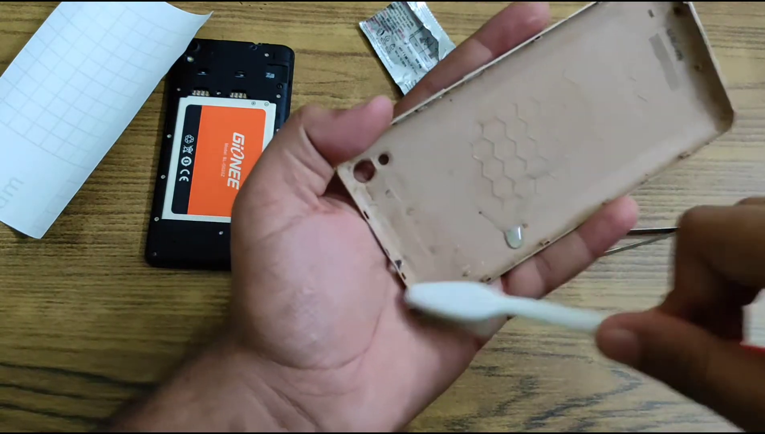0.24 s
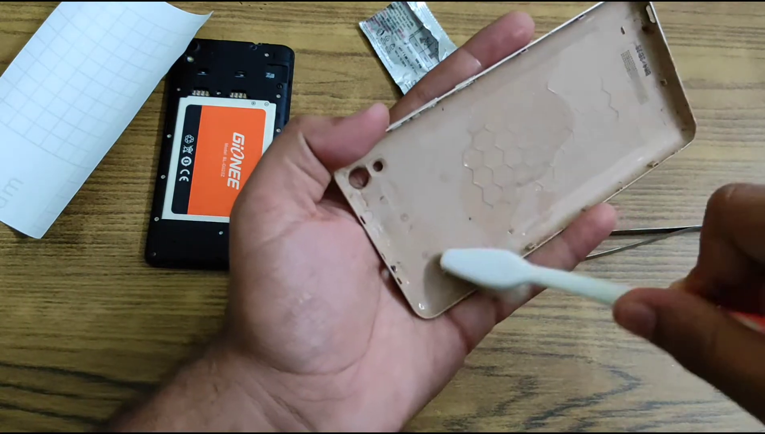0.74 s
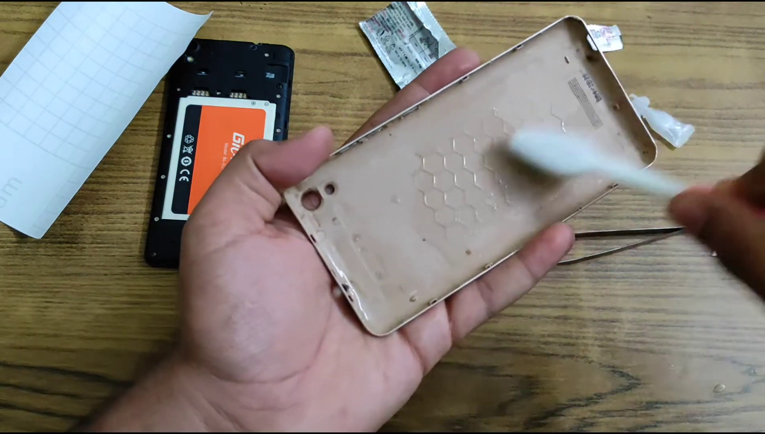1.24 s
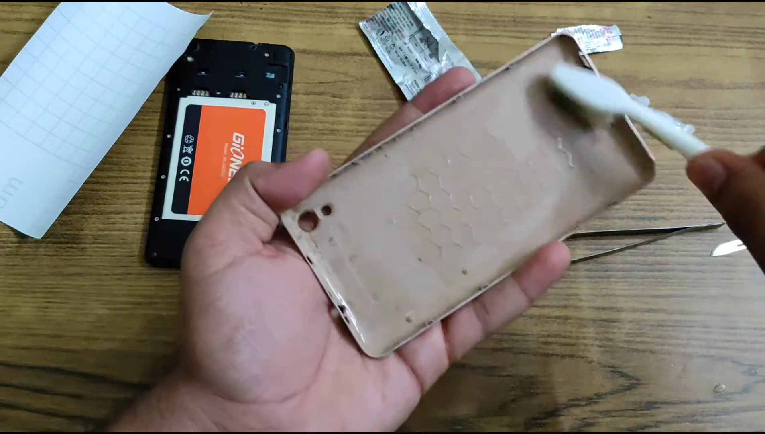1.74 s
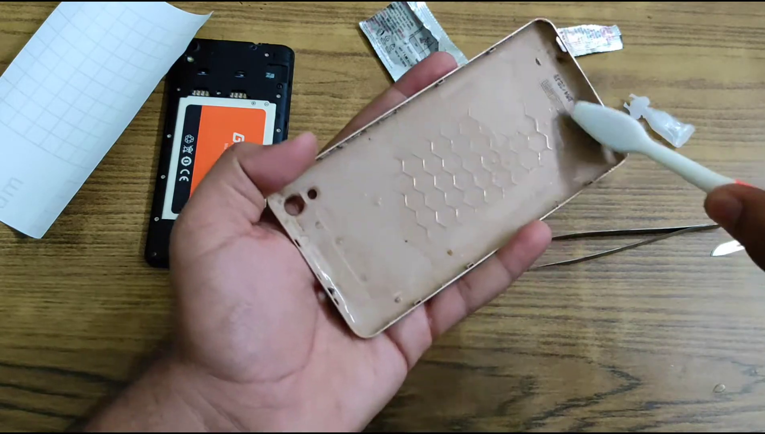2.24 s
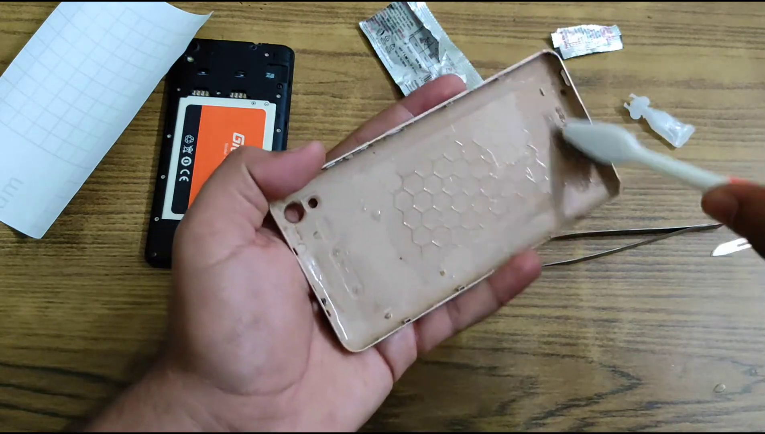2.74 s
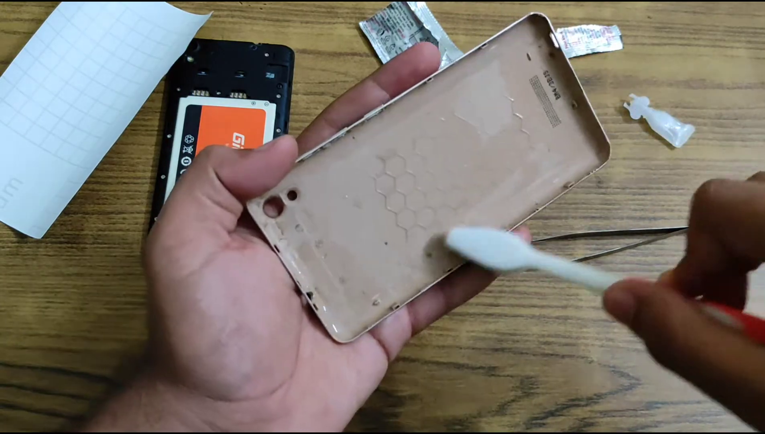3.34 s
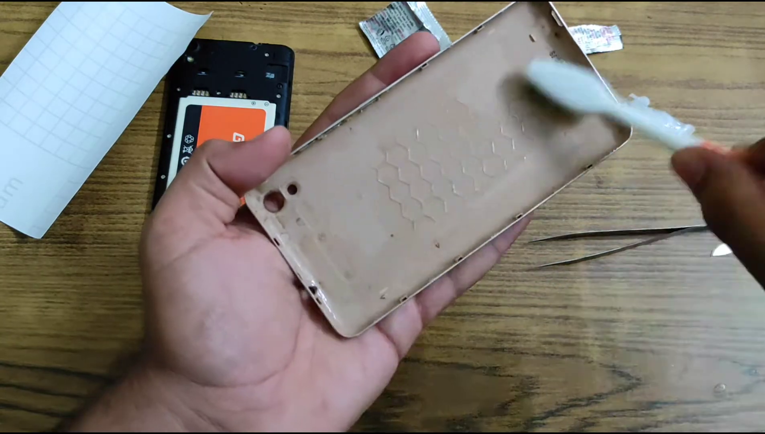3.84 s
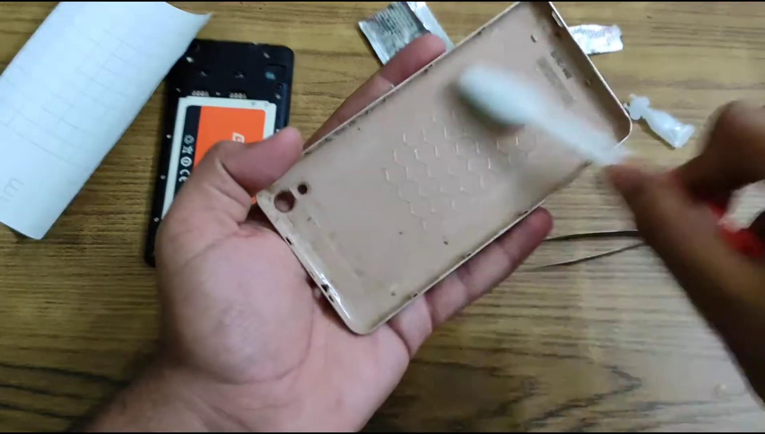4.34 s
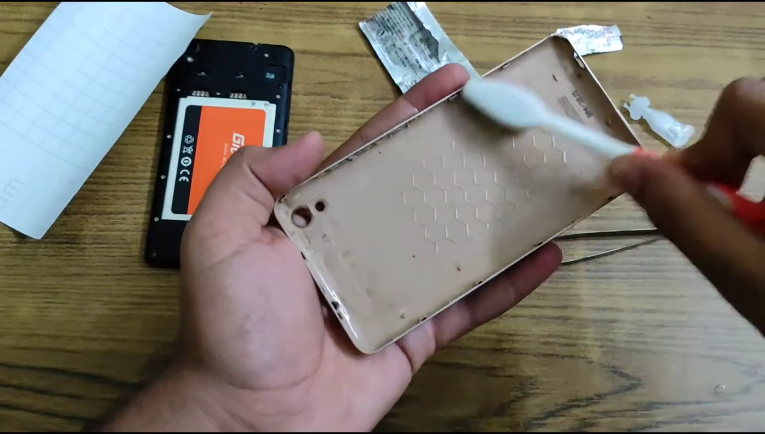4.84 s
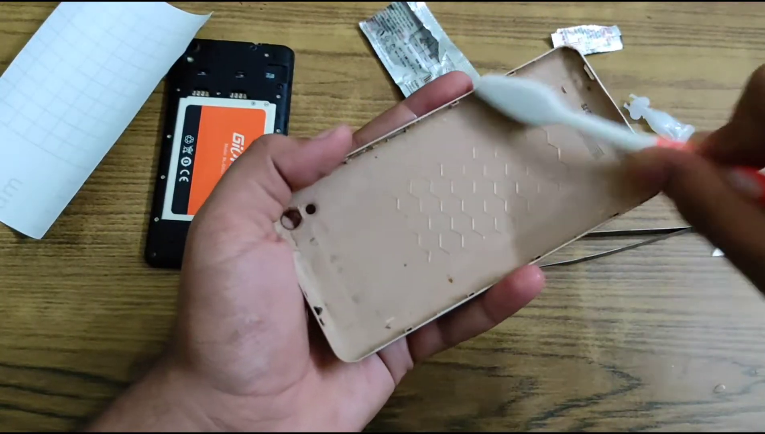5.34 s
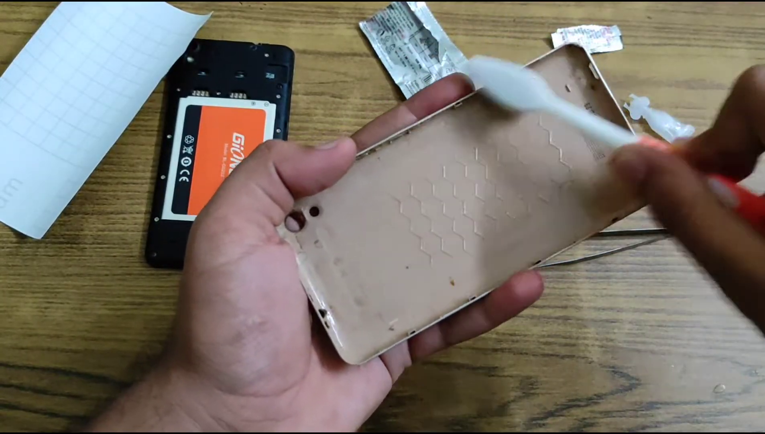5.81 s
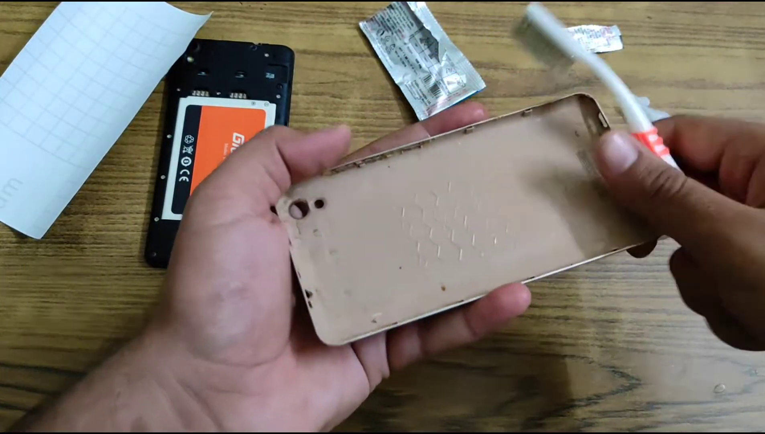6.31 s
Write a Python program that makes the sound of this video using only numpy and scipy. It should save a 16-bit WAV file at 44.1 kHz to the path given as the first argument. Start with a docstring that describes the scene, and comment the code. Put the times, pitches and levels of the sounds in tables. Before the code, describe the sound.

Fast bristly scrubbing on a hollow plastic cover, grainy and bright, growing louder and harder midway, then stopping with a light tap.

```python
"""A wet toothbrush scrubs the inside of a phone's plastic back cover, held in one hand in a small room.
Each stroke follows a sine arch of speed; bristles snap free in random swarms and drum on the shell's modes.
Bristles let go in short bursts, the head knocks and rasps as struck or slipping modes and once judders on the edge.
Fingers, one dull bump, thin drones, hum and room air lie beneath; two microphone ports ring in the treble."""
import sys
import numpy as np
from scipy import signal
from scipy.fft import rfft, irfft
from scipy.io import wavfile
from scipy.ndimage import uniform_filter1d

SR = 44100
rng = np.random.default_rng(int(sys.argv[2]) if len(sys.argv) > 2 else 0)


def materialize(psi):
    """Save the field psi as 16-bit PCM at rate SR to the path in sys.argv[1].

    A 1-D psi becomes a single channel; in a 2-D psi each row is a channel.
    """
    bounded = np.clip(np.atleast_2d(psi).T, -1, 1)
    quanta = np.round(bounded * 32767).astype(np.int16)
    wavfile.write(sys.argv[1], SR, quanta)


N = 289737
TIME = np.arange(N) / SR
BINS = np.fft.rfftfreq(4096, 1 / SR)
HZ = np.fft.rfftfreq(N, 1 / SR)

# Where the brush works. Each row: time in seconds, place from 0 (stiff end wall) to 1 (soft middle of
# the panel), share of bristles scraping the rim (0-1).
PLACE = [(0, 0.85, 0.62), (.42, .2, 1), (.6, 0.16, 0.4), (.85, 0.86, 1), (1.1, 1, 0.6), (1.4, 0.4, 0.27),
         (1.55, 0.036, 0.8), (2.15, 0.17, 1), (2.5, 0.035, 0.96), (2.95, 0.29, 0.6), (3.3, 0.86, 0.62),
         (3.6, 0.87, 0.1), (4.3, 0.58, .15), (4.651, 0.54, 0.04), (4.9, 0.47, 0.27), (5.06, 0.95, 0.52),
         (5.4, 0.85, 0.55), (6, 0.59, 0.75)]
# Spectrum of one bristle snapping on the hard rim. Each row: frequency in Hz, relative level in dB per Hz.
RIM_SPECTRUM = [(150, -63), (600, -16.5), (1400, -8), (2100, 3.5), (3000, 4), (4300, -1), (5300, 5),
                (6500, 0), (8000, -1.5), (9300, -0.5), (10400, -12.5), (12500, -9.5), (16000, -8)]


def amp(db):
    """Decibels to gain."""
    return 10 ** (np.asarray(db) / 20)


def unit(x):
    """Scales to an rms of 1."""
    return x / np.sqrt(np.mean(x ** 2) + 1e-20)


def read(points, hz):
    """Reads a table on a log-frequency axis."""
    f, value = np.transpose(points)
    return np.interp(np.log(hz + 1), np.log(f + 1), value)


def level(s, db):
    """Gain midway between linear and dB interpolation of a level curve, silent outside it."""
    linear = np.interp(TIME, s, amp(db), left=0, right=0)
    logarithmic = amp(np.interp(TIME, s, db))
    return np.sqrt(linear) * np.sqrt(logarithmic)


def add(mix, s, sound):
    """Adds a sound in place at s seconds, cut at the end of the mix."""
    part = mix[round(s * SR):][:len(sound)]
    part += sound[:len(part)]


def causal(gain):
    """Minimum-phase click with this magnitude spectrum."""
    log_gain = np.log(np.maximum(gain, 1e-5))
    mirrored = np.r_[log_gain, log_gain[-2:0:-1]]
    return np.fft.ifft(np.exp(np.conj(signal.hilbert(mirrored)))).real


def ring(x, click):
    """Convolves with a click scaled to unit energy."""
    return signal.oaconvolve(x, click / np.linalg.norm(click))[:N]


def peak(hz, width):
    """Magnitude of one resonance."""
    return BINS * width / np.hypot(hz ** 2 - BINS ** 2, BINS * width)


def wavering(hz, half_width_hz):
    """Narrow noise around one pitch, so a tone that wavers."""
    return unit(irfft(rfft(rng.standard_normal(N)) / (1 + ((HZ - hz) / half_width_hz) ** 2), N))


def rim_snap():
    """Click of one bristle snapping on the hard rim."""
    return causal(amp(read(RIM_SPECTRUM, BINS)))


def shell(where, blow_hz=1000, slope_db=0.0):
    """Ring of the shell driven at one place; a blow favours modes near its own pitch, by slope_db an octave."""
    # Modes of the plastic shell. Each row: frequency in Hz, width in Hz, then relative level in dB when
    # driven on the panel, at the long edge, at the end wall.
    modes = [(278, 127, -6, 1, 1), (355, 68, 0.5, 8, -6), (431, 82, -1.5, 5.5, -25),
             (500, 114, 1.5, -1, -3.5), (697, 360, -5, -1.5, -5), (800, 210, -5, -12, -6),
             (896, 180, -2.5, 3.5, -14), (1004, 175, -1, 4, 11), (1162, 290, -2.5, -4.5, 6),
             (1843, 310, 0.5, -1.5, -7.5), (1920, 200, -1.5, 2, -23), (2088, 520, 1.5, 0.5, 2),
             (2550, 370, -2, -6, -2), (2820, 150, 1, -6, 0.5), (3725, 630, -3.5, -8.5, -4)]
    power = np.zeros(len(BINS))
    for hz, width, panel, edge, wall in modes:
        place_db = {"panel": panel, "edge": edge, "wall": wall}[where]
        db = place_db - slope_db * abs(np.log2(hz / blow_hz))
        power += (amp(db) * peak(hz, width) ** 2) ** 2  # steep skirts leave dark valleys between the modes
    return causal(np.sqrt(power))


def snaps(per_s, spread_db):
    """Random releases of either sign, most small and a few large."""
    at = np.flatnonzero(rng.random(N) < per_s / SR)
    size = np.minimum(rng.exponential(1, len(at)), 4)
    sign = rng.choice([-1., 1.], len(at))
    train = np.zeros(N)
    train[at] = sign * amp(spread_db * size)
    return unit(train)


def clumps(hz, depth_db):
    """Tufts catch and let go together, so the swarm comes in lumps."""
    slow = irfft(rfft(rng.standard_normal(N)) / (1 + (HZ / hz) ** 2), N)
    return unit(amp(depth_db * unit(slow)))


def pair(x, lag):
    """Sound that reaches the right port lag seconds after the left."""
    return np.array([x, np.interp(TIME - round(lag * SR) / SR, TIME, x)])


def strokes(swish_gain_db=0.12, drum_gain_db=0.5, drum_power=0.5):
    """Brush speed rises and falls along a sine arch; swish follows it, drumming its power drum_power."""
    # Each row: start in seconds, time speeding up in seconds, time slowing down in seconds, crest exponent
    # (about 1 = broad, 5 = peaked), relative bristle swish in dB, relative drumming of the shell in dB.
    stroke_rows = [(-0.055, 0.021, 0.14, 2.9, -32.5, -47), (0.158, 0.12, 0.055, 0.98, -37, -51),
                   (0.406, 0.012, 0.063, 2.6, -34.5, -49.5), (0.442, 0.083, 0.12, 2.5, -34.5, -53.0),
                   (0.666, 0.0095, 0.061, 2.9, -36.5, -48), (0.722, 0.085, 0.092, 2.7, -30.5, -39),
                   (0.874, 0.069, 0.021, 1.6, -45.0, -61), (0.966, 0.13, 0.11, 2.7, -37, -49),
                   (1.17, 0.1, 0.031, 1.37, -33, -47.0), (1.305, 0.091, 0.041, 1.16, -34, -49),
                   (1.473, 0.11, 0.062, 2, -38, -43.5), (1.641, 0.089, 0.06, 1.27, -32, -46),
                   (1.759, 0.093, 0.123, 1.9, -37.0, -44.5), (1.933, 0.08, 0.087, 2.3, -35, -46.0),
                   (2.082, 0.039, 0.11, 2.04, -30.5, -41), (2.191, 0.15, 0.0046, 2, -34.5, -49),
                   (2.379, 0.099, 0.19, 2.43, -35.5, -48), (2.668, 0.087, 0.099, 1.27, -36.5, -48.5),
                   (2.85, 0.11, 0.076, 2.4, -31.5, -44), (3.05, 0.29, 0.073, 4.5, -35.5, -51.5),
                   (3.38, 0.082, 0.097, 1.5, -37, -55), (3.541, 0.058, 0.14, 1.8, -32.5, -55.5),
                   (3.668, 0.15, 0.054, 2.3, -30, -43), (3.852, 0.046, 0.12, 1.63, -29, -42.5),
                   (3.998, 0.083, 0.046, 1.6, -26.5, -38), (4.137, 0.043, 0.078, 0.81, -28, -44),
                   (4.239, 0.093, 0.035, 1.3, -25.5, -40.5), (4.377, 0.033, 0.087, 1.7, -24.5, -43.0),
                   (4.468, 0.091, 0.045, 2.2, -26.5, -42), (4.605, 0.031, 0.1, 2.55, -26, -42.0),
                   (4.73, 0.073, 0.054, 1.17, -28.5, -41.0), (4.858, 0.052, 0.071, 2.2, -28.5, -42.5),
                   (4.971, 0.12, 0.071, 2.16, -24, -35.5), (5.172, 0.03, 0.054, 0.64, -34, -50.5),
                   (5.272, 0.078, 0.03, 1.36, -25.5, -42.0), (5.41, 0.035, 0.075, 0.81, -41.0, -61.0),
                   (5.522, 0.025, 0.089, 1.36, -30.5, -49), (5.641, 0.026, 0.033, 1.8, -44, -57.5),
                   (5.757, 0.053, 0.12, 4.3, -34.5, -50), (5.95, 0.08, 0.068, 3.3, -33.5, -47)]
    swish, drum = np.zeros((2, N))
    for start, rise, fall, crest, swish_db, drum_db in stroke_rows:
        ramp = np.minimum((TIME - start) / rise, 1 - (TIME - start - rise) / fall)
        moving = ramp > 0
        speed = np.sin(np.pi / 2 * ramp[moving]) ** crest
        swish[moving] += (amp(swish_db) * speed) ** 2
        drum[moving] += (amp(drum_db) * speed ** drum_power) ** 2
    return amp(swish_gain_db) * np.sqrt(swish), amp(drum_gain_db) * np.sqrt(drum)


def flicks(rise_s=0.0021, decay_s=0.009):
    """Effort of short bursts of bristles letting go, on rim or panel: each swells at once, dies exponentially."""
    # Each row: start in seconds, relative level in dB.
    flick_rows = [(0.169, -32.5), (0.412, -34), (0.499, -27.5), (0.764, -32), (1.009, -39), (1.347, -31),
                  (2.701, -37), (3.413, -33.5), (4.247, -36), (4.412, -21.5), (4.886, -37), (5.026, -22.5),
                  (5.047, -15.5), (5.058, -20), (5.288, -28), (6, -29)]
    spray, t = np.zeros(N), TIME[:SR // 12]
    burst = np.minimum(t / rise_s, np.exp((rise_s - t) / decay_s))
    for s, db in flick_rows:
        add(spray, s, amp(db) * burst)
    return spray


def bristles(effort, count=6):
    """Tufts lie at different places under the ports; each scrapes on the rim or slides on the wet panel."""
    # Slide of one bristle on the wet panel. Each row: frequency in Hz, relative level in dB per Hz.
    slide_spectrum = [(150, -36), (600, -16.5), (1400, -20), (2100, -15), (4300, -4.5), (5500, -5),
                      (7000, -2.5), (8500, 0.5), (9400, -2), (10400, -8.5), (12500, -7.5), (16000, -6)]
    s, _, share = np.transpose(PLACE)
    rim = np.interp(TIME, s, share)
    snap, slide = rim_snap(), causal(amp(read(slide_spectrum, BINS)))
    out = np.zeros((2, N))
    for lag in np.linspace(-.00016, .00016, count):
        scraping = ring(effort * np.sqrt(rim) * snaps(per_s=600, spread_db=0.0), snap)
        sliding = ring(effort * np.sqrt(1 - rim) * snaps(per_s=1100, spread_db=1.0), slide)
        out += pair(amp(-14.0) * scraping + amp(-15.5) * sliding, lag)
    return out / np.sqrt(count)


def crackle(effort, count=12, cycles=3.1, crackle_db=-35.0):
    """Single wet bristles catch and ping at one of count pitches, decaying by 1/e in a few cycles."""
    train = effort * snaps(per_s=210, spread_db=4.5)
    which = rng.integers(0, count, N)
    t, out = TIME[:SR // 100], np.zeros(N)
    for k, hz in enumerate(np.geomspace(2300, 7000, count)):
        ping = np.exp(-t * hz / cycles) * np.sin(2 * np.pi * hz * t)
        out += ring(train * (which == k), ping)
    return amp(crackle_db) * out


def catches(effort, per_s=70, catch_db=1.5):
    """Single bristles hook a rib of the shell at random and snap out above the swarm."""
    hooked = (rng.random(N) < per_s / SR) * rng.uniform(.4, 1, N)
    return amp(catch_db) * ring(effort * hooked, rim_snap())


def hard_snaps(snap_db=-0.5):
    """Single stiff bristles strike the rim and stand out above the swarm."""
    # Each row: time in seconds, relative level in dB.
    snap_rows = [(0.413, -36), (0.676, -43), (0.766, -31), (1.008, -45), (2.0355, -21.5), (2.3302, -27),
                 (4.2488, -20), (4.4165, -25), (5.0502, -14), (5.29, -25), (5.347, -22)]
    train = np.zeros(N)
    for s, db in snap_rows:
        add(train, s, amp([db]))
    return amp(snap_db) * ring(train, rim_snap())


def drumming(press):
    """Snaps shake the shell: bright near the end wall, deeper in the middle."""
    s, place, _ = np.transpose(PLACE)
    soft = np.interp(TIME, s, place)
    stiff = ring(press * np.sqrt(1 - soft) * snaps(per_s=1800, spread_db=0.5), shell("wall"))
    deep = ring(press * np.sqrt(soft) * snaps(per_s=1400, spread_db=3.5), shell("panel"))
    return amp(-3.0) * stiff + amp(-4.5) * deep


def knocks(rebound_s=0.0027, rebound=0.67):
    """The brush head strikes the shell: a hard tick, the ring of the modes and one quick rebound."""
    # Each row: start in seconds, relative level in dB, relative treble tick in dB, favoured pitch in Hz.
    knock_rows = [(1.064, -35, 4, 750), (1.341, -38, -20, 330), (1.762, -32, -20, 800),
                  (2.034, -25.5, -2, 1000), (2.045, -29.5, -19, 900), (2.328, -29, -27, 1200),
                  (2.511, -30, -17, 1120), (2.8, -31, -17, 800), (2.965, -33.5, 2, 650),
                  (4.058, -39, -8.5, 500), (4.249, -27, 0.5, 550), (4.507, -29, -1, 800),
                  (4.632, -32.5, -7, 320), (4.811, -26.5, -11, 1500), (4.912, -24, 4, 550),
                  (5.095, -27, -10.5, 900), (5.189, -32, -15, 1800), (5.304, -33, -15, 500),
                  (6.266, -25.5, 0, 720)]
    out, tick = np.zeros(N), unit(rim_snap())
    for s, db, tick_db, blow_hz in knock_rows:
        body = unit(shell("panel", blow_hz, slope_db=4.5))
        blow = amp(db) * (amp(-22.5) * body + amp(tick_db - 34.5) * tick)
        add(out, s, blow)
        add(out, s + rebound_s * rng.uniform(0.582, 1.4), rebound * blow)
    return out


def rasps(slope_db=4.0, attack_s=0.0015, fade_s=0.0042):
    """The hard edge of the head slips in a short close run and rings the modes near one pitch."""
    # Each row: start in seconds, length before the fade in seconds, relative level in dB, favoured pitch in Hz.
    rasp_rows = [(.175, 0.011, -47, 400), (0.497, 0.029, -44, 800), (1.441, .05, -51.5, 1400),
                 (1.511, 0.066, -47, 1000), (2.483, 0.026, -36.5, 1300), (2.698, 0.017, -42.5, 1560),
                 (2.936, 0.033, -45, 800), (4.253, 0.039, -38, 453), (4.438, .03, -44.5, 700),
                 (4.814, 0.02, -43.5, 1490), (4.995, 0.007, -44, 1990), (6.268, 0.011, -43.5, 254)]
    out, t = np.zeros(N), TIME[:SR // 8]
    for s, length, db, hz in rasp_rows:
        slips = unit(rng.standard_normal(len(t)) * (rng.random(len(t)) < 1500 / SR))
        force = np.minimum(t / attack_s, 1) * np.exp(-np.maximum(t - length, 0) / fade_s)
        add(out, s, amp(db) * ring(force * slips, shell("panel", hz, slope_db)))
    return amp(-2.5) * out


def judder(slip_hz=190):
    """Uneven stick and slip of the head against the edge shakes the shell and scrapes the rim."""
    # Each row: time in seconds, relative level in dB.
    judder_curve = [(0.791, -55), (.794, -30.5), (.812, -27.5), (0.831, -32.5), (0.859, -34), (0.871, -61)]
    turns = np.cumsum(slip_hz * clumps(hz=299.7, depth_db=3.5)) / SR  # slip_hz is the rms rate
    slips = np.diff(np.floor(turns), prepend=0) * rng.uniform(0.54, 1, N)
    force = level(*np.transpose(judder_curve))
    rough = unit(unit(slips) + 1.15 * rng.standard_normal(N))
    hollow = ring(force * rough, shell("edge"))
    scrape = ring(force * snaps(per_s=4300, spread_db=3.0), rim_snap())
    return amp(-0.5) * hollow + amp(-13.5) * scrape


def fingers():
    """Skin rubs softly over the plastic as the cover is turned over: dense small snaps."""
    # Each row: time in seconds, relative level in dB.
    rub_curve = [(6.268, -73), (6.28, -51), (6.325, -50.5), (6.39, -80), (6.497, -82), (6.504, -58.5),
                 (6.57, -67)]
    rub = level(*np.transpose(rub_curve)) * snaps(per_s=3000, spread_db=5.0)
    return amp(-16) * ring(rub, rim_snap())


def bump(decay_s=0.0094):
    """One dull bump: decaying noise rings two low modes, in opposite directions at the two ports."""
    # One row: start in seconds, relative level in dB.
    bump_row = (4.251, -25)
    s, db = bump_row
    push = np.zeros(N)
    add(push, s, amp(db) * np.exp(-TIME[:SR // 8] / decay_s))
    thud = ring(push * rng.standard_normal(N), causal(peak(195, 130) + 0.71 * peak(350, 180)))
    return amp(1.5) * np.array([-.6 * thud, thud])


def shifting(x):
    """Random slow and quick changes of colour at each port make the scrubbing grainy and uneven."""
    z = signal.stft(x, SR, nperseg=512)[2]
    slow, quick = rng.standard_normal((2, *z.shape))
    for axis, size in [(1, 3), (1, 3), (2, 12), (2, 12)]:  # axis 1 = frequency bins, 2 = frames
        slow = uniform_filter1d(slow, size, axis)
    quick = uniform_filter1d(uniform_filter1d(quick, size=4, axis=1), size=2, axis=2)
    gain_db = 1.4 * unit(slow) + 2.6 * unit(quick) - 1.1
    return signal.istft(z * amp(gain_db), SR, nperseg=512)[1][:, :N]


def aimed(x, top_hz=10500):
    """The brush moves and turns under the ports: the swish leans to one side, its top octave swells and fades."""
    # Each row: time in seconds, left minus right in dB, gain above top_hz in dB.
    aim_curve = [(0, -.5, -2), (.45, 0.5, 2.5), (1.2, 2, 2.5), (1.7, -1, -2), (2.2, 0, 2.5),
                 (2.75, 0.5, -2.5), (3.2, 0, -3), (3.6, 1, 1.5), (4.3, -2.1, -2), (4.75, -2, -2),
                 (5.08, -1.5, -7.5), (5.5, -1, -2), (6, -0.5, -2.5)]
    s, lean_db, top_db = np.transpose(aim_curve)
    top = irfft(rfft(x) * (1 - 1 / (1 + (HZ / top_hz) ** 16)), N)
    lean = np.interp(TIME, s, lean_db) / 2
    bright = x + (amp(np.interp(TIME, s, top_db)) - 1) * top
    return bright * amp([lean, -lean])


def room(x, table_db=-8.0, tail_db=-8.0, count=4):
    """Quick echoes from table and hands, which change as the hands move, then the tail of the walls."""
    # Decay of the tail. Each row: frequency in Hz, time to fall 60 dB in seconds.
    t60_curve = [(200, 0.53), (1000, 0.45), (4000, 0.44), (8000, 0.34), (15000, 0.38)]
    out = x.copy()
    knots = np.arange(0, N / SR + .2, .14)
    chosen = np.eye(count)[rng.integers(0, count, len(knots))].T
    early = TIME[:SR // 80]
    for weight in chosen:  # one echo pattern per pose of the hands, crossfaded
        pose = np.interp(TIME, knots, weight)
        near = rng.standard_normal((2, len(early))) * (early > .0006) * np.exp(-early / 0.006)
        near /= np.linalg.norm(near[0])
        out += amp(table_db) * signal.oaconvolve(x * np.sqrt(pose), near, axes=1)[:, :N]
    size = SR // 2
    taps = rng.choice([-1., 1.], (2, size)) * (rng.random((2, size)) < 4000 / SR) * (TIME[:size] > .006)
    hz, t, z = signal.stft(taps, SR, nperseg=256)
    decay = amp(-60 * t / read(t60_curve, hz)[:, None])
    tail = signal.istft(z * decay, SR, nperseg=256)[1][:, :size]
    return out + amp(tail_db) * signal.oaconvolve(x, tail / np.linalg.norm(tail[0]), axes=1)[:, :N]


def drones():
    """Faint thin wavering tones, like far traffic, that swell and fade along a half sine."""
    # Each row: start in seconds, end in seconds, pitch in Hz, level in dB.
    drone_rows = [(3.072, 3.63, 399, -62.5), (6.265, 6.698, 276.4, -60)]
    out = np.zeros(N)
    for start, end, pitch_hz, db in drone_rows:
        swell = np.sin(np.pi * np.clip((TIME - start) / (end - start), 0, 1))
        out += amp(db) * wavering(pitch_hz, half_width_hz=3.5) * swell
    return out


def air(air_db=-55.5, hum_db=-62.0, hum_hz=62.4):
    """Still room air, low noise nearly alike at both ports in the bass, and a wavering hum."""
    # Each row: frequency in Hz, relative level in dB per Hz.
    air_spectrum = [(10, 1.5), (25, 7.5), (42, -8), (100, -6), (200, -0.5), (350, -8), (700, -15.5),
                    (1500, -21), (3000, -29), (8000, -45), (15000, -76)]
    shared, *own = rfft(rng.standard_normal((3, N)))
    same = 0.73 / (1 + (HZ / 1800) ** 2)  # share of power common to both ports
    mixed = np.sqrt(same) * shared + np.sqrt(1 - same) * np.array(own)
    noise = irfft(mixed * amp(read(air_spectrum, HZ)), N)
    both = amp(air_db) * unit(noise) + amp(hum_db) * wavering(hum_hz, half_width_hz=6)
    return both * amp([[1.5], [-1.7]])


def scene():
    """The strokes drive bristles and shell together; both sound into the room."""
    sweep, drum = strokes()
    grip = clumps(hz=127, depth_db=0.93)
    effort, press = grip * np.hypot(sweep, flicks()), grip * drum
    swarm = shifting(bristles(effort) + pair(crackle(effort), lag=-.00003))
    single = pair(hard_snaps() + catches(effort) + fingers(), lag=.00002)
    swish = aimed(swarm + single)
    head = pair(judder() + rasps() + knocks(), lag=.00004) * amp([[.8], [-.8]])
    plastic = shifting(pair(drumming(press), lag=.00005)) + head
    wet = room(swish, table_db=1.0, tail_db=-6.5) + room(plastic, table_db=-7.5, tail_db=-8.5)
    return wet + bump() + drones() + air()


def record(dry, edge_hz=15850):
    """Each microphone port rings at its own pitch; then the band limit."""
    # Left, then right. Each row: resonance in Hz, width in Hz, resonance gain in dB.
    port_rows = [(8580, 896, 23), (7577, 800, 24)]
    ported = []
    for x, (hz, width, db) in zip(dry, port_rows):
        port = causal(np.hypot(1, amp(db) * peak(hz, width)))
        ported.append(signal.oaconvolve(x, port)[:N])
    edge = signal.firwin(511, edge_hz, window=("kaiser", 9), fs=SR)
    return signal.oaconvolve(np.array(ported), edge[None], "same", axes=1)


dry = scene()
out = record(dry)
materialize(out)
```